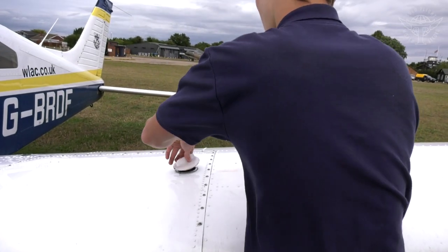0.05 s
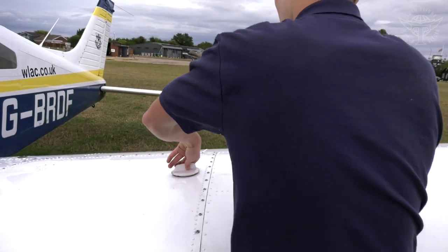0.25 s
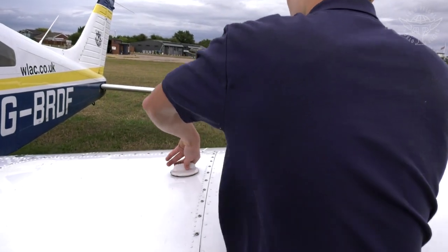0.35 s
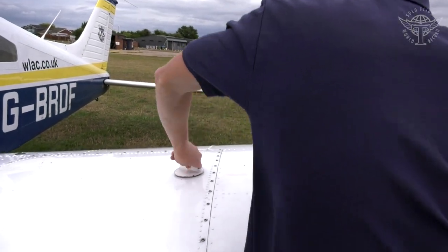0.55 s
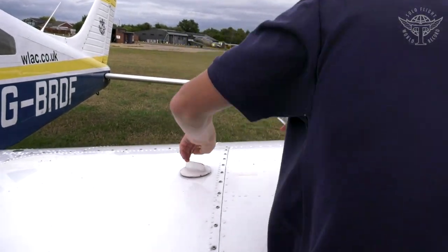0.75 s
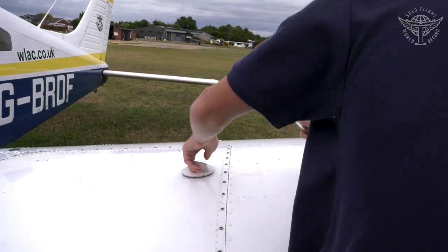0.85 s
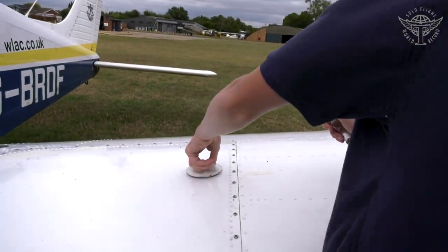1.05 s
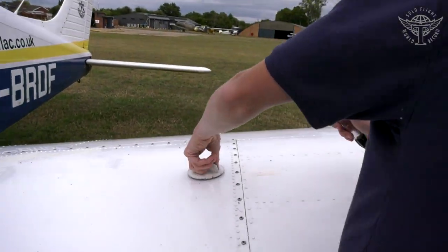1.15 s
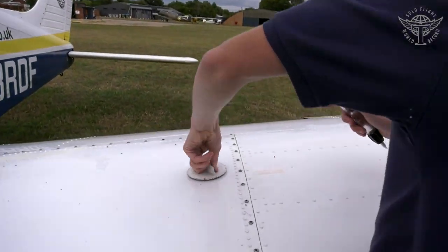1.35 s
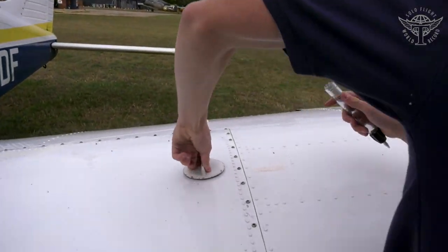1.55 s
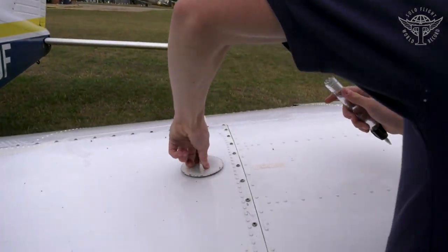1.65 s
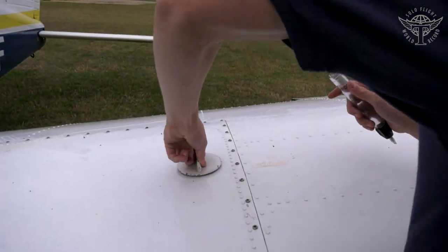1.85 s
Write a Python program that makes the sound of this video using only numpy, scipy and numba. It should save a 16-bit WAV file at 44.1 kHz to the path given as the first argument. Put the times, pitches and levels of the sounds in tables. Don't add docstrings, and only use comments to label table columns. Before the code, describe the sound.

Metal cap closing on a thin hollow aircraft wing: a sharp rattling clack with a brief squeak, fading taps, a quiet gap, then small clicks ending in a firmer snap, heard close over a faint open-field rumble.

```python
import sys
import numpy as np
from scipy import signal
from scipy.fft import rfft, irfft
from scipy.io import wavfile
from scipy.ndimage import uniform_filter1d
from numba import njit

SR = 44100
rng = np.random.default_rng(int(sys.argv[2]) if len(sys.argv) > 2 else 0)


def file_out(sig):
    cols = np.atleast_2d(sig).T
    lim = np.clip(cols, -1, 1)
    pcm = np.round(lim * 32767).astype(np.int16)
    wavfile.write(sys.argv[1], SR, pcm)


def to_linear_factor(level_db):
    exponent = np.asarray(level_db, float) / 20
    return 10 ** exponent


N = 83790


def unit(x):
    return x / np.sqrt(np.mean(x ** 2))


def read(table, hz):
    points = np.array(table)
    return np.interp(np.log(hz), np.log(points[:, 0]), points[:, 1])


def colour(x, gain):
    hz = np.maximum(np.fft.rfftfreq(len(x), 1 / SR), 1)
    return irfft(rfft(x) * gain(hz), len(x))


def bell(hz, centre, octaves):
    return np.exp(-.5 * (np.log2(hz / centre) / octaves) ** 2)


def narrow_noise(hz, width):
    b, a = signal.iirpeak(hz, hz / width, fs=SR)
    return unit(signal.lfilter(b, a, signal.lfilter(b, a, rng.standard_normal(N))))


def butter(x, order, hz, kind="low"):
    return signal.sosfilt(signal.butter(order, hz, kind, fs=SR, output="sos"), x)


def walk(rate):
    hold = int(SR / rate)
    steps = np.repeat(rng.standard_normal(N // hold + 1), hold)
    return unit(uniform_filter1d(uniform_filter1d(steps, hold), hold)[:N])


@njit
def ring(at, hit_gain, rub, rub_gain, pole):
    out = np.zeros(len(rub))
    for m in range(len(pole)):
        z, k = 0j, 0
        for i in range(len(rub)):
            z = z * pole[m] + rub[i] * rub_gain[m]
            while k < len(at) and at[k] <= i:
                z += hit_gain[k, m]
                k += 1
            out[i] += z.imag
    return out


def strike(times, gains, hz, t60, rub, rub_gain):
    order = np.argsort(times)
    pole = np.exp((2j * np.pi * hz - np.log(1000) / t60) / SR)
    at = (times[order] * SR).astype(np.int64)
    return ring(at, gains[order], rub + 1e-18, rub_gain, pole)


# start_s, peak_db, centre_hz, spread_octaves
CAP_TICKS = [(0.216, -22, 6500, 2.1), (.2245, -58, 6000, 1.2), (0.2356, -12.5, 5300, 0.95),
             (0.2425, -38, 9100, 1.6), (0.26, -43, 9900, 0.3), (.2665, -42, 10500, .4),
             (0.272, -35, 7100, .4), (0.243, -24, 3500, 0.44), (.252, -39, 3540, .5),
             (0.2966, -30, 6940, 0.43), (0.3123, -19, 6250, 0.52), (0.3208, -21, 4900, 0.5),
             (0.331, -29.5, 6130, 1.1), (0.34, -46, 9000, 0.31), (0.4458, -34, 3960, 0.43),
             (0.561, -50.5, 6000, 0.51), (0.569, -44, 5430, 0.71), (0.5825, -44, 5500, 0.52),
             (0.612, -47, 6750, 0.42), (0.6197, -37, 6060, 0.71), (0.641, -31, 6400, 0.64),
             (0.649, -37, 10000, 1.3), (1.325, -55, 3950, 0.74), (1.345, -44, 6000, 0.99),
             (1.3545, -30, 8500, 1.1), (1.375, -48, 4500, .8), (1.41, -39, 5500, 0.35),
             (1.43, -46, 4020, 0.53), (1.4635, -51, 8500, 0.34), (1.476, -49, 4940, 0.5),
             (1.485, -39, 6000, 0.61), (1.515, -41, 5030, 0.66), (1.3906, -51, 7550, 0.88),
             (1.4205, -37.5, 5060, 0.47), (1.504, -41, 7040, 0.44), (1.5567, -29.5, 6500, 0.71),
             (1.5706, -18.5, 6000, 2.1), (1.578, -20, 3430, 0.42), (1.615, -34, 6960, 2.6),
             (1.618, -46, 12000, 0.22), (1.716, -50, 7950, 0.64)]
# pitch_hz, level_db, t60_s
CAP_MODES = [(2090, 12, 0.014), (3320, -29, 0.014), (3570, 4, 0.017), (4500, -1, 0.012),
             (4150, -37, 0.0077), (5300, -32, 0.011), (5630, -2, 0.03), (5900, 6, 0.012), (6360, 4, 0.021),
             (7550, -28, 0.0086), (8400, -29, .012), (9330, -18, 0.011), (10700, -14, 0.013),
             (12700, -18, .008)]
# pitch_hz, level_db
RASP_COLOUR = [(1200, -22), (2490, -1), (3520, -5.5), (5900, -14), (8000, -17.5), (10800, -21.5),
               (16000, -36)]


def cap():
    ticks, modes = np.array(CAP_TICKS), np.array(CAP_MODES)
    spot = to_linear_factor(0.98 * rng.standard_normal((len(ticks), len(modes))))
    near_centre = bell(modes[:, 0], ticks[:, 2:3], ticks[:, 3:4])
    gains = to_linear_factor(ticks[:, 1:2] + modes[:, 1] - 21) * spot * near_centre
    out = strike(ticks[:, 0], gains, modes[:, 0], modes[:, 2], np.zeros(N), np.zeros(len(modes)))
    out = butter(out, 2, 13000)

    attack_s, crack_t60_s, tail_t60_s, tail_db = .0005, .012, 0.1, -16
    age = np.arange(4096) / SR
    fade = to_linear_factor(-60 * age / crack_t60_s) + to_linear_factor(tail_db - 60 * age / tail_t60_s)
    shape = np.minimum(age / attack_s, 1) * fade
    for start, db, hz, spread in ticks:
        noise = rng.standard_normal(len(age))
        crack = unit(colour(noise, lambda f: to_linear_factor(read(RASP_COLOUR, f)) * bell(f, hz, spread)))
        i = int(start * SR)
        out[i:i + len(age)] += to_linear_factor(db - 11.5) * shape * crack
    return out


# start_s, length_s, scrape_db, squeak_hz, squeak_db
TWIST_MOVES = [(0.219, 0.029, -50, 3570, -44.5), (0.26, 0.035, -54.5, 5860, -42),
               (0.295, 0.02, -50, 4440, -45), (0.34, 0.038, -101, 3580, -66),
               (0.524, 0.045, -74.5, 6160, -77), (0.558, 0.044, -69.5, 5840, -73),
               (0.583, 0.022, -66, 7500, -63), (0.611, 0.014, -67, 8200, -57), (.612, .012, -80, 6100, -59),
               (.655, .025, -85, 6700, -72), (1.316, 0.058, -72.5, 5830, -88),
               (1.355, 0.027, -63, 4970, -69), (1.383, .008, -70, 9500, -64),
               (1.412, 0.04, -68, 10700, -62), (1.404, .035, -69, 8900, -67), (1.408, .022, -75, 9500, -65),
               (1.463, .03, -68, 8300, -65), (1.455, 0.04, -72, 10700, -66), (1.5, .02, -67, 10700, -62),
               (1.5, .018, -72, 8300, -67), (1.5, .018, -80, 9700, -67), (1.537, 0.028, -68, 10800, -65),
               (1.557, 0.011, -62, 5720, -51), (1.551, .016, -68, 8900, -62),
               (1.602, 0.017, -59, 4360, -69), (1.633, 0.065, -69, 4900, -75),
               (1.35, 0.041, -72, 1440, -66), (1.724, 0.16, -79.5, 3150, -93)]


def twisting():
    attack_s, release_s, squeak_width_hz = .002, 0.016, 480
    t = np.arange(N) / SR
    grains = rng.standard_normal(N) * to_linear_factor(2.4 * walk(350) + 1.0 * walk(60))
    pressure, squeak = np.zeros(N), np.zeros(N)
    for start, length, scrape_db, hz, squeak_db in TWIST_MOVES:
        release = np.exp(-np.maximum(t - start - length, 0) / release_s)
        press = np.clip((t - start) / attack_s, 0, 1) * release
        pressure += press * to_linear_factor(scrape_db)
        patchy_db = 2.5 * walk(320) - 2
        squeak += press ** 2 * to_linear_factor(squeak_db + patchy_db) * narrow_noise(hz, squeak_width_hz)
    return unit(grains) * pressure, squeak


def scrape(rub):
    return colour(rub, lambda f: to_linear_factor(read(RASP_COLOUR, f) + 18.5) / (1 + (1300 / f) ** 4))


# start_s, strength_db, centre_hz, panel_under_blow_hz
WING_KNOCKS = [(0.2161, -10, 368, 352), (.234, -7.5, 760, 644), (0.2417, -4, 566, 644),
               (.2465, -10, 487, 512), (.261, -8, 420, 512), (.268, -21, 290, 287), (.2765, -15, 480, 742),
               (.297, -15, 665, 730), (0.307, -12, 390, 391), (.3145, -11.5, 620, 853),
               (.332, -13, 390, 391), (0.351, -11.5, 248, 853), (.377, -19.5, 380, 860),
               (0.411, -19.5, 200, 105), (.447, -28.5, 350, 391), (0.508, -29.5, 225, 231),
               (.563, -26, 400, 391), (.585, -25.5, 520, 512), (.6, -21, 485, 593), (.617, -21, 710, 717),
               (0.6268, -14.5, 685, 770), (.636, -23.5, 705, 730), (.649, -24, 446, 391),
               (.671, -18, 340, 325), (1.197, -61, 574, 512), (1.326, -39, 510, 644),
               (1.345, -25, 530, 512), (1.355, -19.5, 708, 736), (1.362, -21, 694, 853),
               (1.373, -21.5, 610, 512), (1.395, -22, 410, 391), (1.419, -38, 505, 512),
               (1.428, -21.5, 695, 853), (1.438, -28, 392, 391), (1.447, -21, 600, 742),
               (1.458, -22, 343, 287), (1.475, -36, 395, 308), (1.500, -28, 500, 927),
               (1.519, -35.5, 400, 322), (1.551, -21.5, 404, 360), (1.561, -19.5, 670, 640),
               (1.570, -17, 760, 512), (1.579, -11, 800, 800), (1.589, -22.5, 540, 622),
               (1.615, -36, 497, 352), (1.630, -26.5, 390, 391), (1.67, -51, 595, 600),
               (1.74, -30, 296, 231)]
# pitch_hz, level_db, t60_s
WING_PANELS = [(105, -8.5, 0.067), (145.6, 0.5, 0.17), (231, -7, 0.31), (287.2, 2.5, 0.091),
               (325, -2.5, 0.092), (354.4, 1, 0.13), (393.8, -1, 0.11), (510, -2, 0.11), (622, -3.5, 0.1),
               (652, -2, 0.052), (742, -0.5, 0.064), (800, -15, 0.13), (851.3, -6, 0.091),
               (919.6, -7, 0.085)]
# pitch_hz, level_db
SKIN_LEVEL = [(90, -6), (150, -24.5), (300, -5.5), (520, -6.5), (760, -8.5), (1070, -12), (1600, -14),
              (3200, -23)]


def wing(rub):
    knocks, panels = np.array(WING_KNOCKS), np.array(WING_PANELS)
    count = len(panels)

    place = rng.random((160, 2))
    crowd_hz = 90 * (3200 / 90) ** ((np.arange(160) + place[:, 0]) / 160)
    crowd_t60 = .15 * (crowd_hz / 400) ** -0.27 * (.7 + .6 * place[:, 1])
    crowd_db = -2.5 + read(SKIN_LEVEL, crowd_hz) + 10 * np.log10(crowd_hz / 400) - 5.5
    hz = np.r_[panels[:, 0], crowd_hz]
    t60 = np.r_[panels[:, 2], crowd_t60]
    gain = to_linear_factor(np.r_[panels[:, 1], crowd_db]) / 6

    spot = .2 + rng.standard_normal((len(knocks), len(hz)))
    scatter_db = 2.5 * rng.standard_normal((len(knocks), count))
    favour = 1 + 1.48 * bell(panels[:, 0], knocks[:, 3:], 0.034)
    spot[:, :count] = np.sign(spot[:, :count]) * to_linear_factor(scatter_db) * favour

    softness = 0.069 + bell(hz, knocks[:, 2:3], 0.94)
    hit_gain = to_linear_factor(knocks[:, 1:2]) * gain * softness * spot
    rub_gain = gain * to_linear_factor(28.5 - 21.5) * np.sign(spot[0])
    drum = strike(knocks[:, 0], hit_gain, hz, t60, rub, rub_gain)
    return butter(drum, 4, 1900)


# pitch_hz, t60_s
LINGER_TIME = [(150, 2.84), (400, 1.04), (1000, 0.21), (3000, 1.5), (6000, 0.37), (9000, 0.9)]
# pitch_hz, level_db
LINGER_LEVEL = [(100, -4), (200, -9), (400, -9), (1000, -7.5), (3000, -32), (9000, -28)]


def linger(x):
    age, tail = np.arange(SR + SR // 4) / SR, 0
    for hz in 100 * 2. ** np.arange(8):
        noise = rng.standard_normal(len(age))
        octave = colour(noise, lambda f: np.cos(np.pi / 2 * np.clip(np.log2(f / hz), -1, 1)))
        fade = to_linear_factor(-60 * age / read(LINGER_TIME, hz)) * np.minimum(age / 0.01, 1)
        tail = tail + octave * fade * to_linear_factor(read(LINGER_LEVEL, hz)) / np.sqrt(np.sum(fade ** 2))
    return signal.fftconvolve(x, tail)[:N]


# pitch_hz, level_db (per Hz)
FIELD_COLOUR = [(25, -14.5), (60, -4), (130, -6.5), (320, 0.5), (520, -13), (1300, -24), (2200, -36.5),
                (15000, -47.5)]


def airfield():
    out, swell = 0, walk(1.2)
    air = colour(rng.standard_normal(N), lambda f: to_linear_factor(read(FIELD_COLOUR, f)))
    for hz in 30 * 2 ** np.arange(0, 9.6, .5):
        part = colour(air, lambda f: np.cos(np.pi * np.clip(np.log2(f / hz), -.5, .5)) ** 2)
        steadiness = min(1, 600 / hz)
        out = out + part * to_linear_factor((swell + walk(11.0)) * steadiness)
    drone = narrow_noise(122.7, 33) * to_linear_factor(-53.5)
    return unit(out) * to_linear_factor(-48) + drone


def scene():
    rub, squeak = twisting()
    near = cap() + scrape(rub) + squeak + wing(rub)
    near = butter(near + linger(near), 4, 100, "high")
    return (near + airfield())[None]


def band_limit(x):
    return signal.sosfilt(signal.butter(12, 16240, fs=SR, output="sos"), x)


def record(dry):
    top_cut = signal.ellip(8, .2, 70, 15900, fs=SR, output="sos")
    mix = signal.sosfilt(top_cut, dry)
    return band_limit(mix)


dry = scene()
out = record(dry)
file_out(out)
```